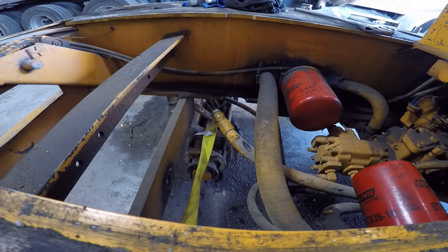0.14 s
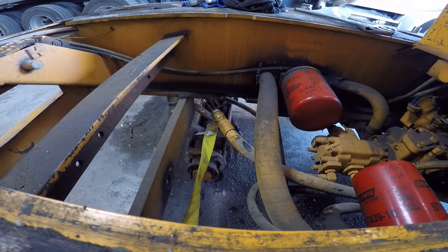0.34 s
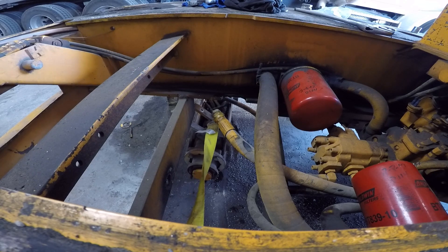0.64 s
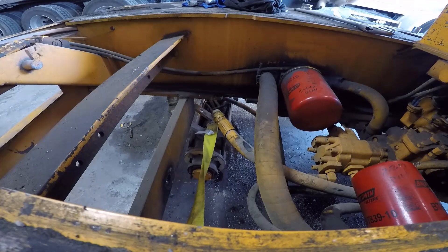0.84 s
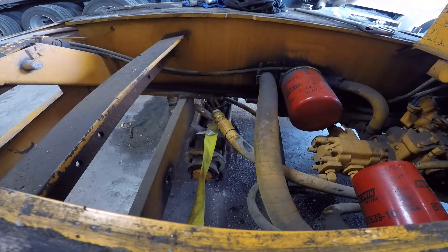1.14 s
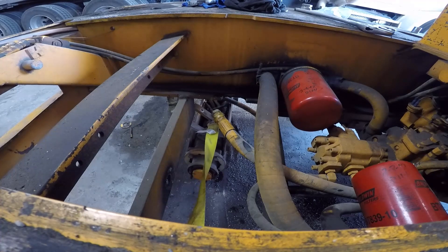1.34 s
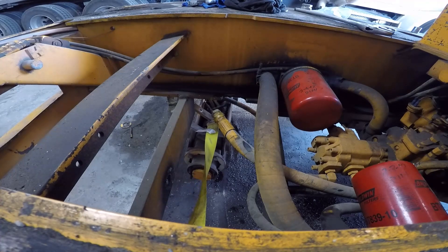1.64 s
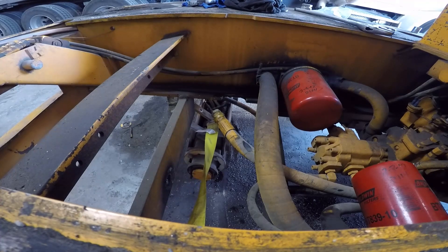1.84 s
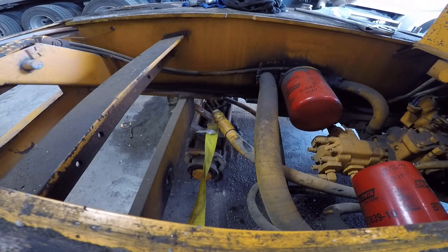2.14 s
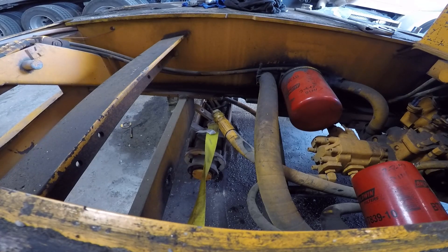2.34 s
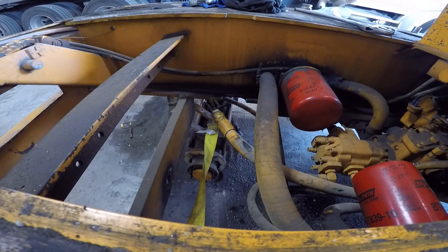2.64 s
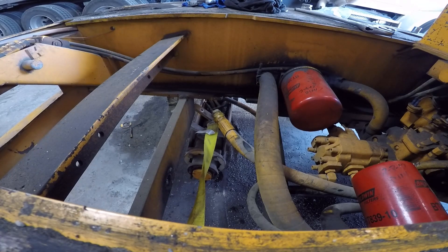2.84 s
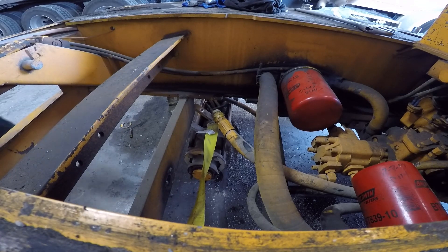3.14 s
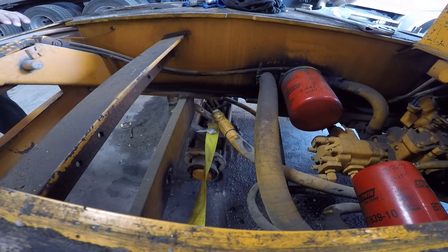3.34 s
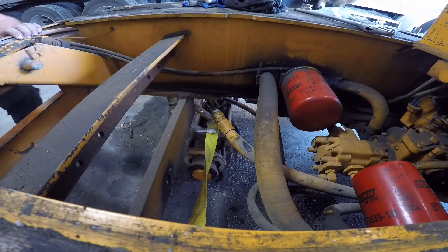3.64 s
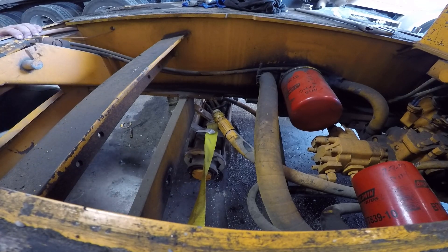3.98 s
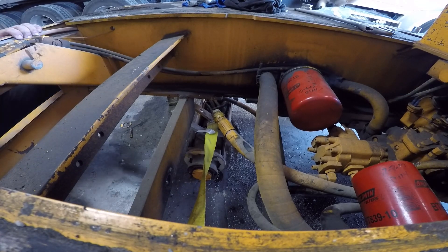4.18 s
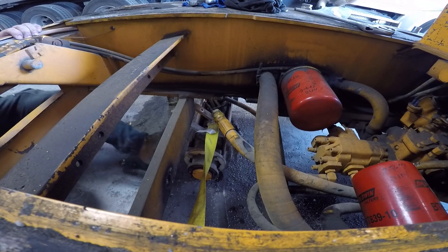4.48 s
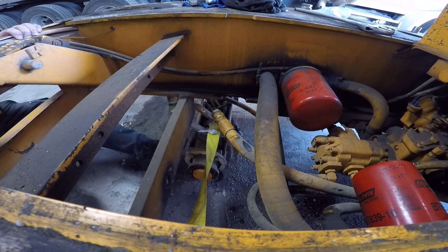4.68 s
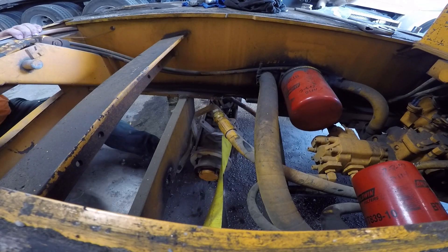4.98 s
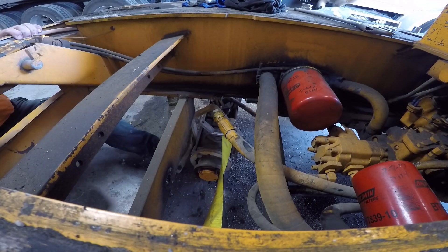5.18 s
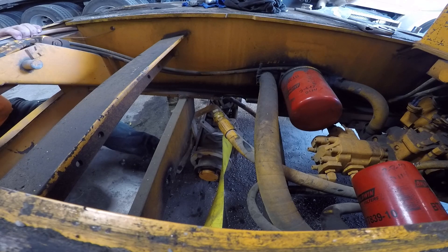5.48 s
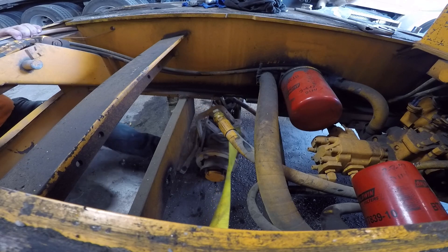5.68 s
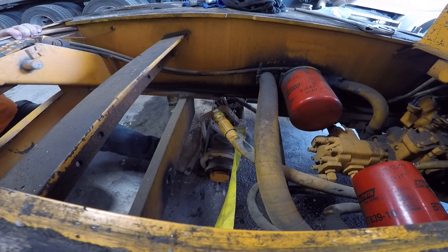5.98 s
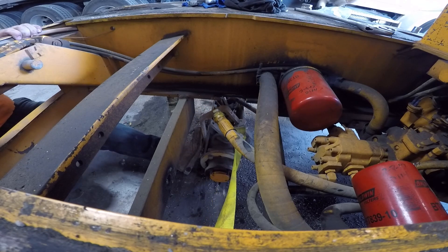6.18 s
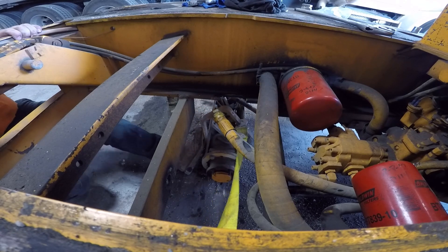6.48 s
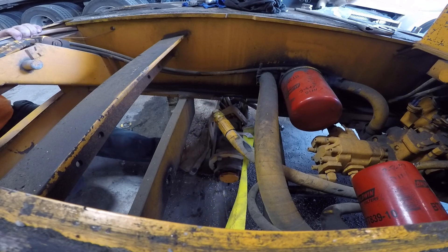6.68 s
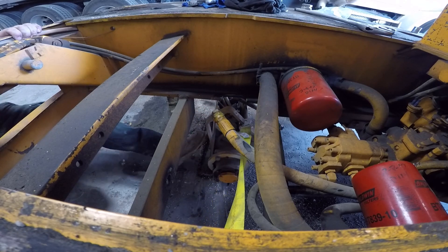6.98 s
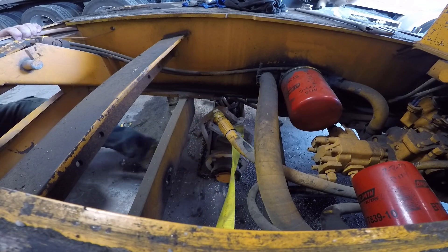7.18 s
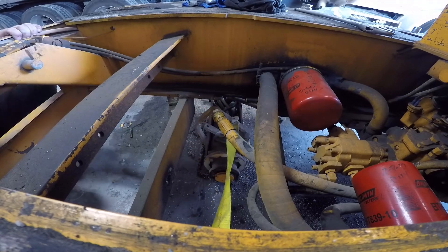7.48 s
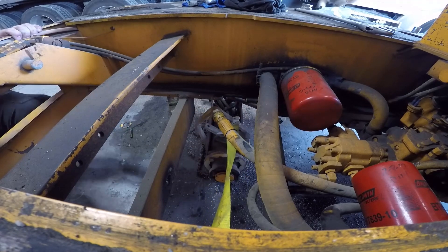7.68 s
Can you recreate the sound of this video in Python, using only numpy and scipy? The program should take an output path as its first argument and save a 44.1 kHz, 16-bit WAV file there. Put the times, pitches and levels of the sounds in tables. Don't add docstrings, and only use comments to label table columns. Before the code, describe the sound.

A fast-idling diesel engine holds a loud, steady low drone, with gear whine, metallic clatter and rushing fan air close by outdoors.

```python
import sys
import numpy as np
from scipy import signal
from scipy.fft import rfft, irfft, next_fast_len
from scipy.io import wavfile

SR = 44100
rng = np.random.default_rng(int(sys.argv[2]) if len(sys.argv) > 2 else 0)


def invert_db(level):
    return 10 ** (np.asarray(level, dtype=float) / 20)


def generate_wav(signal):
    frames = np.transpose(np.atleast_2d(signal))
    scaled = np.clip(frames, -1, 1) * 32767
    pcm = np.round(scaled).astype(np.int16)
    wavfile.write(sys.argv[1], SR, pcm)


N = 344862
CONTROL_STEP = 64


def rms_one(x):
    return x / np.sqrt(np.mean(x ** 2))


def in_time(rows):
    return np.interp(np.arange(N) / SR, *np.transpose(rows))


def stretched(slow):
    return np.interp(np.arange(N) / CONTROL_STEP, np.arange(len(slow)), slow)


def drift(rate_hz):
    pole = np.exp(-2 * CONTROL_STEP * np.pi * rate_hz / SR)
    settle = 1000
    noise = rng.standard_normal(N // CONTROL_STEP + 2 + settle)
    slow = signal.lfilter([1], [1, -2 * pole, pole * pole], noise)[settle:]
    return rms_one(slow - slow.mean())


def coloured(x, spectrum, peaks=()):
    fft_size = next_fast_len(N)
    f_hz, density_db = np.transpose(spectrum)
    bins_hz = np.maximum(np.arange(fft_size // 2 + 1) * SR / fft_size, 1)
    level_db = np.interp(np.log(bins_hz), np.log(f_hz), density_db, left=-200, right=-200)
    for peak_hz, width_hz, lift_db in peaks:
        level_db += lift_db / (1 + (2 * (bins_hz - peak_hz) / width_hz) ** 2)
    return irfft(rfft(x, fft_size) * invert_db(level_db) * np.sqrt(SR / 2), fft_size)[:N]


def tones(turns, rows, phases, waver_db, waver_rad, waver_hz):
    total = np.zeros(N)
    for (multiple, level_db), phase in zip(rows, phases):
        wander = waver_rad * drift(waver_hz) / (2 * np.pi)
        cycles = multiple * turns + stretched(phase + wander)
        angle = (2 * np.pi * (cycles - np.floor(cycles))).astype(np.float32)
        peak = np.sqrt(2) * invert_db(level_db + waver_db * drift(waver_hz))
        total += stretched(peak) * np.cos(angle)
    return total


def contacts(turns, angles, sizes, jitter_s, uneven_db):
    laps = np.arange(int(turns[-1]) + 1)[:, None]
    shape = (len(laps), len(angles))
    at = np.interp(laps + angles, turns, np.arange(N))
    at = at + jitter_s * SR * rng.standard_normal(shape)
    at = np.clip(at, 0, N - 2).ravel()
    blows = (sizes * invert_db(uneven_db * rng.standard_normal(shape))).ravel()
    blows[(at < 1) | (at > N - 3)] = 0
    return rms_one(np.bincount(np.round(at).astype(int), blows, N))


def exhaust(turns):
    # [multiple of shaft speed, level/dB rms]
    orders = [(1, -39.9), (2, -15.1), (2.5, -38.7), (3, -33.8), (3.5, -42.8), (4, -18.6), (5, -49.0),
              (8, -50.8), (9, -47.6), (14, -40.3), (16, -44.3), (17, -49.0), (29, -48.1), (32, -51.3),
              (39, -49.3), (46, -56.0), (50, -55.5), (53, -59.0), (61, -54.5), (68, -59.3), (69, -58.8),
              (70, -55.6)]
    beat_lead, odd_lead, half_lag = .227, .24, .23
    firing = tones(turns, orders[1:2], [beat_lead], waver_db=.1, waver_rad=.01, waver_hz=8)
    low_orders = [*orders[:1], *orders[2:7]]
    leads = []
    for multiple, _ in low_orders:
        every_turn = multiple % 2 == 1
        every_second_turn = multiple % 1 > 0
        leads.append(beat_lead + odd_lead * every_turn - half_lag * every_second_turn)
    low = tones(turns, low_orders, leads, waver_db=.3, waver_rad=.05, waver_hz=8)
    high = tones(turns, orders[7:], rng.random(30), waver_db=1.5, waver_rad=.3, waver_hz=3)
    return firing + low + invert_db(-1.5) * high


def pumps(turns):
    # [multiple of stroke rate, level/dB rms]
    six_piston = [(6, -49.1), (7, -46.5), (8, -49.0), (9, -52.6), (10, -49.2), (11, -58.9), (12, -48.7),
                  (13, -56.5), (14, -59.3), (15, -59.6), (18, -67.6), (19, -66.1), (22, -64.8), (23, -74.6),
                  (28, -71.7), (34, -78.0), (36, -69.6), (38, -73.3), (40, -61.9), (41, -81.9)]
    # [multiple of tooth rate, level/dB rms]
    ten_tooth = [(1, -39.3), (2, -45.4), (10, -63.4), (11, -58.7), (13, -65.4), (14, -62.0), (15, -63.2),
                 (16, -69.9), (20, -68.7), (21, -70.3), (22, -65.5), (23, -71.4), (26, -71.1)]
    # [multiple of shaft speed, level/dB rms]
    gears_and_drives = [(82, -65.1), (88, -60.1), (89, -58.1), (92, -60), (99, -61.7), (128, -62.6), (136, -66.5),
                        (137, -66.4), (141, -70), (148, -66.0), (158, -69.3), (172, -70.0), (194, -72.2), (201, -71.4),
                        (231, -70.3), (236, -67.7), (237, -70.8), (241, -71), (242, -73), (243, -67.5), (248, -72.1),
                        (255, -68.7), (258, -71.5), (284, -78.0),
                        (19.1, -49), (23.04, -45.5), (78, -63.5), (90.1, -60), (51.6, -57.5), (84.3, -65),
              (94.1, -70.5), (91.6, -67), (95.7, -67), (104.7, -73.5), (121.6, -69.5), (118.4, -71.5),
              (138, -71.5), (134, -65.5), (152, -71), (162, -71), (170, -71), (175.6, -71), (27, -46.5),
              (207, -75), (184, -72), (259.5, -71), (216, -68.5), (274, -77), (308, -83.5), (312, -81.5),
              (321, -83)]
    six = tones(6 * turns, six_piston, rng.random(30), waver_db=2.4, waver_rad=.45, waver_hz=3)
    ten = tones(10 * turns, ten_tooth, rng.random(30), waver_db=1.3, waver_rad=.3, waver_hz=3)
    mesh = tones(turns, gears_and_drives, rng.random(60), waver_db=2.6, waver_rad=.55, waver_hz=3)
    return six + ten + mesh


def fan(turns):
    # [multiple of blade rate, level/dB rms]
    blade_tones = [(1, -42), (2, -32), (3, -42), (4, -65)]
    # [f/Hz, density/dB per Hz]
    roar = [(20, -55), (60, -56), (110, -55), (140, -57.5), (160, -63.5), (215, -60), (260, -57),
            (310, -54), (380, -48), (450, -57), (540, -52.5), (760, -57.5), (870, -66)]
    # [t/s, gain/dB]
    gust = [
        (0, 1.3),
        (2.2, 1.4),
        (4.3, 0.5),
        (7.82, 0.76),
    ]
    blades_per_turn = 7.512
    blades = tones(blades_per_turn * turns, blade_tones, rng.random(4), waver_db=1.6, waver_rad=.3, waver_hz=4)
    buffet = invert_db(-49) * stretched(drift(8.4) * invert_db(4.2 * drift(1.4)))
    return blades + buffet + invert_db(in_time(gust)) * coloured(rng.standard_normal(N), roar)


def knocks(turns):
    count = 150
    sizes = invert_db(2.5 * rng.exponential(1, count)) * rng.choice([-1, 1], count)
    clatter = contacts(turns, rng.random(count), sizes, jitter_s=6e-6, uneven_db=.5)
    piston_angles = (np.arange(6) + .3) / 6
    strokes = contacts(turns, piston_angles, invert_db(rng.normal(0, 3.7, 6)), jitter_s=40e-6, uneven_db=2.5)
    hard = signal.butter(2, 2600, "high", fs=SR)
    return signal.lfilter(*hard, invert_db(-3.5) * clatter + invert_db(-24.5) * strokes)


def casing(turns, knock):
    # [f/Hz, density/dB per Hz]
    casing_noise = [(870, -63.5), (1030, -61.5), (1300, -68.5), (1800, -71.5), (1980, -76), (2350, -79.5),
                    (2750, -83), (3200, -83.5), (3700, -84), (4800, -86.5), (5400, -90), (6300, -86),
                    (6750, -90), (7150, -92.5)]
    # [f/Hz, width/Hz, lift/dB]
    panels = [(1090, 30, 3), (1570, 50, 4), (1870, 50, 5), (2050, 70, 5), (2340, 130, 5), (2590, 80, 5),
              (2860, 40, 4), (3340, 60, 5), (3645, 60, 5), (3900, 60, 5), (4180, 150, 4), (5220, 60, 6),
              (5720, 60, 4), (6000, 70, 4), (6250, 90, 6), (6635, 60, 5)]
    pulsing = 1 + .2 * np.cos(12 * np.pi * (turns - .05))
    return coloured(pulsing * rng.standard_normal(N) + knock, casing_noise, panels)


def oil(turns, knock):
    # [f/Hz, density/dB per Hz]
    hiss = [(7150, -95.5), (8300, -99), (9500, -105), (10800, -114), (11700, -109), (12200, -102),
            (12500, -100.5), (13400, -101), (13750, -100), (14200, -108), (14700, -105), (15400, -103)]
    # [f/Hz, width/Hz, lift/dB]
    pipes = [(7200, 40, 3), (7570, 40, 6), (8200, 40, 4), (8250, 62, -1.5), (9500, 60, 6),
             (10000, 110, 1.5), (12040, 130, 5.5), (12700, 61, 6), (13100, 120, 4.5), (13750, 120, 7),
             (14372, 100, 7), (14934, 60, 12.5)]
    throb = 1 + np.zeros(N)
    for per_turn, depth in ((6, .11), (5, .083), (20, .08)):
        throb += depth * np.cos(2 * np.pi * per_turn * turns)
    return coloured(throb * rng.standard_normal(N) + knock, hiss, pipes)


def scene():
    # [t/s, speed/turns per s]
    shaft = [(0.0, 25.945), (0.54, 26.044), (0.61, 26.143), (0.93, 26.021), (1.19, 26.08), (1.49, 25.887),
             (1.55, 26.018), (2.05, 25.945), (2.37, 26.142), (2.57, 26.043), (3.76, 25.953), (3.85, 26.073),
             (4.63, 25.954), (5.05, 26.152), (5.96, 25.984), (6.42, 26.057), (7.16, 26.005), (7.82, 26.153)]
    start_turn = .138
    turns = start_turn + np.cumsum(in_time(shaft)) / SR
    knock = knocks(turns)
    tonal = invert_db(.48) * exhaust(turns) + invert_db(.52) * pumps(turns)
    return (tonal + fan(turns) + casing(turns, knock) + oil(turns, knock))[None]


def roll_off(x):
    return signal.sosfilt(signal.butter(12, 15300, fs=SR, output="sos"), x)


def record(dry):
    limit, offset = .95, -.0039
    return roll_off(limit * np.tanh(dry / limit) + offset)


dry = scene()
out = record(dry)
generate_wav(out)
```